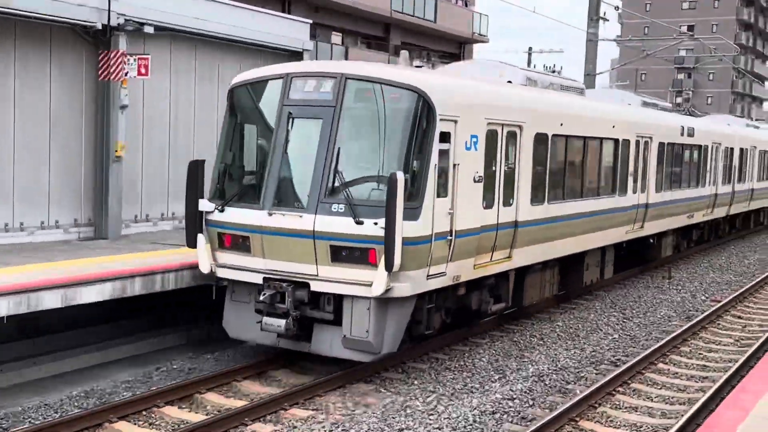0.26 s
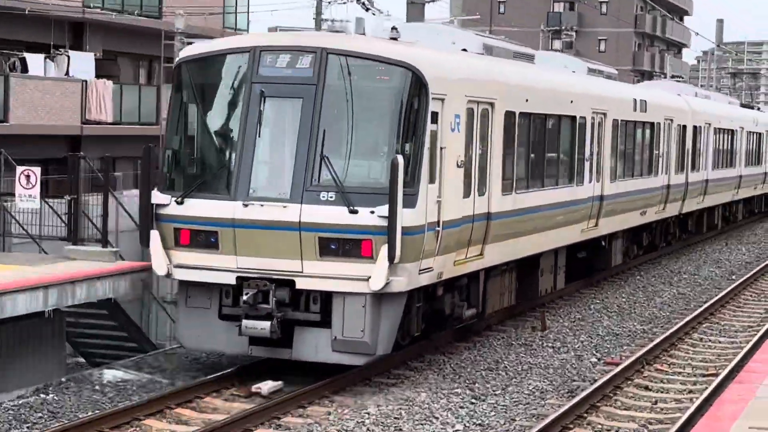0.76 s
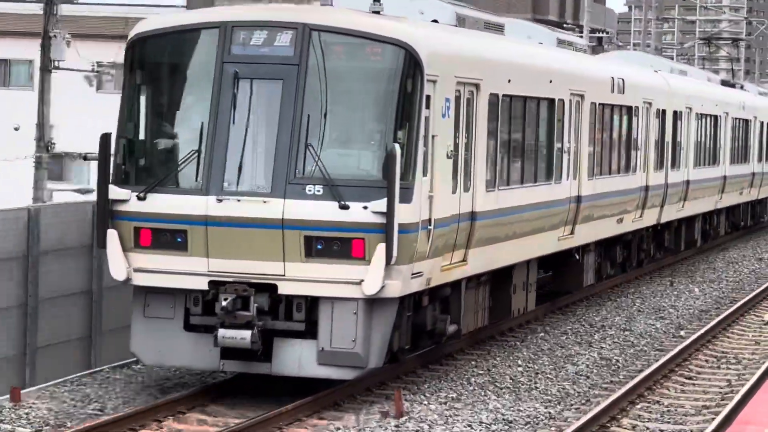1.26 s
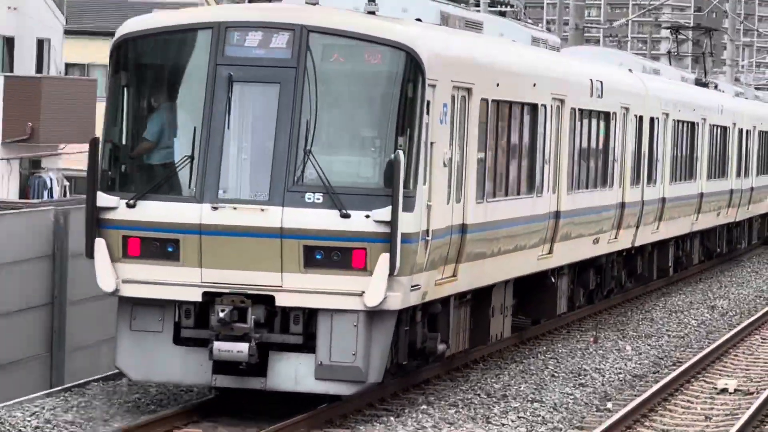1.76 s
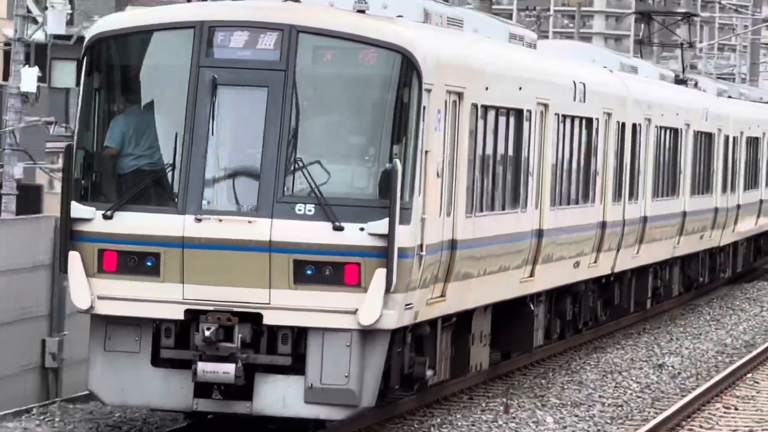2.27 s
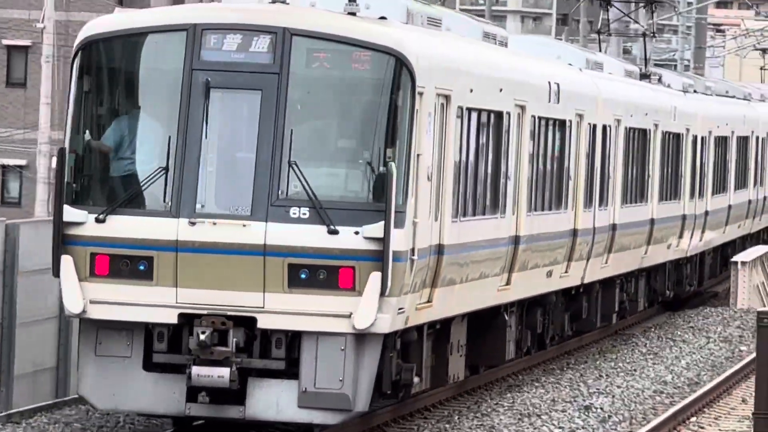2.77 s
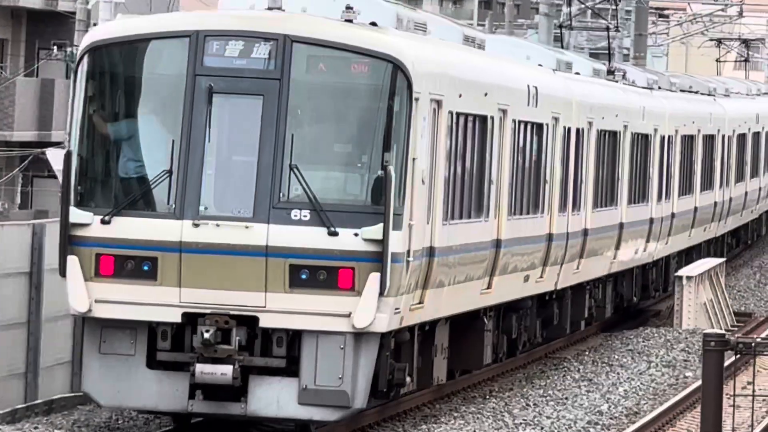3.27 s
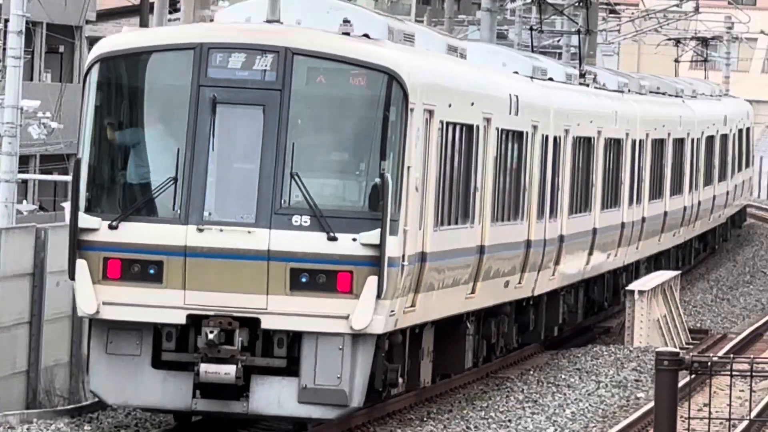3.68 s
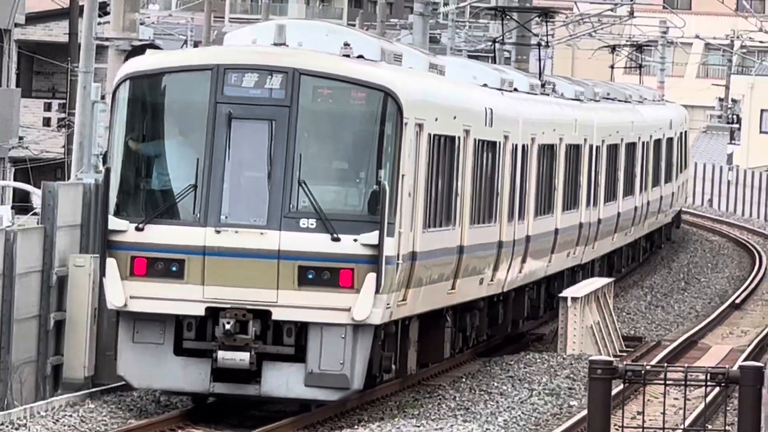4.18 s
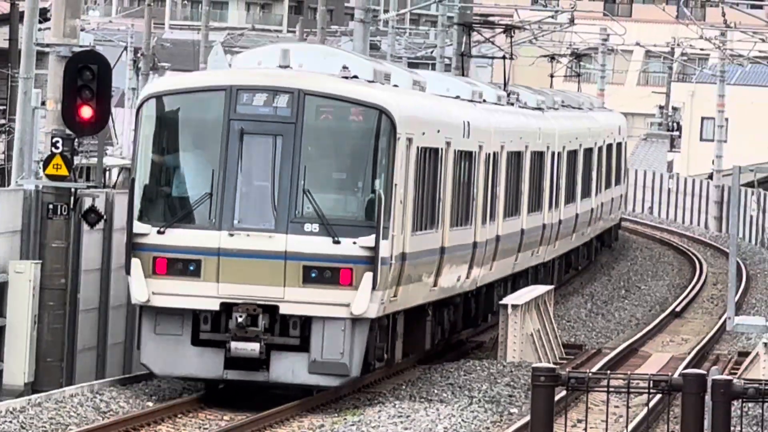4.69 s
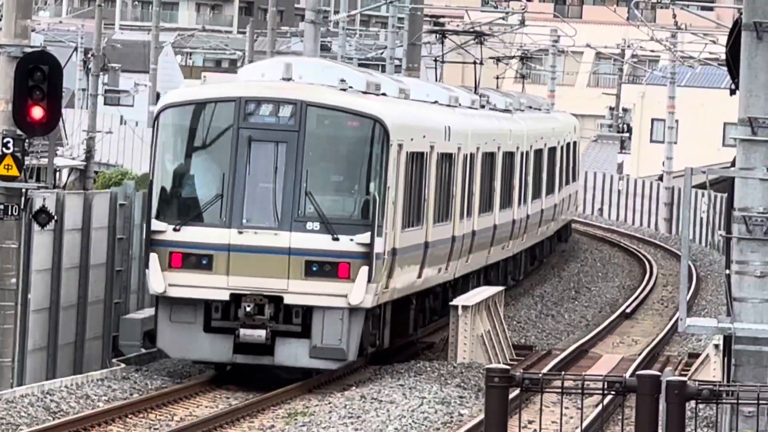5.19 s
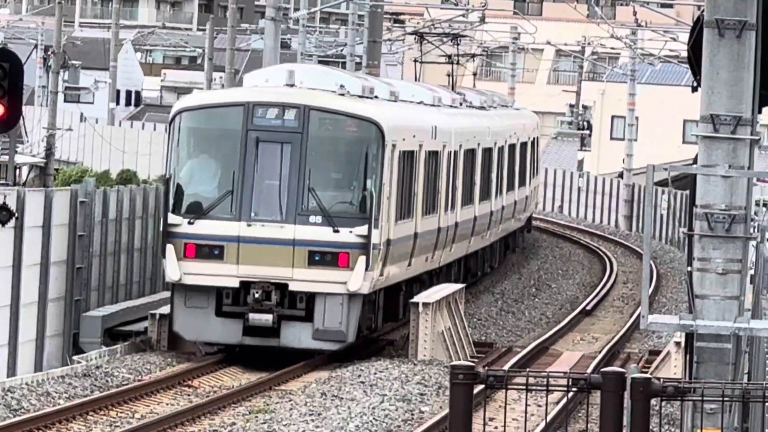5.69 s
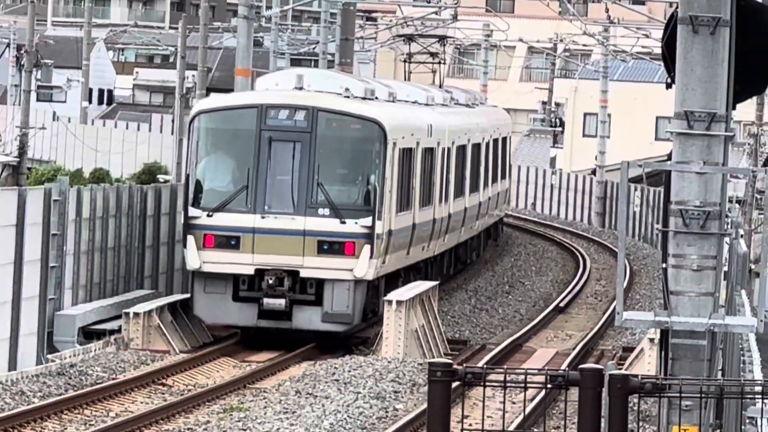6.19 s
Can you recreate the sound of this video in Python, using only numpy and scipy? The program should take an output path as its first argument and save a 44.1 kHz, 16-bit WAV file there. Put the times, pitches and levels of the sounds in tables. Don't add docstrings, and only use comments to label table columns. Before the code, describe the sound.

A hand-held camera on an open-air platform hears an electric train rolling away. From 0 s the last car is only a few metres off: a broad, rough roar of wheels on rail, with metallic ringing and soft joint clacks about every 0.2 seconds until 2.3 s. A fuzzy low gear hum around 390 Hz swells early, strongest near 0.6 s, and returns more weakly. Wind rumbles and flutters on the microphone, with deep thumps crowded between 0.1 and 0.7 s and a strong one at 2.45 s. The roar fades quickly at first, then gradually, growing duller. Slight scrapes come near 3.4 and 4.8 s. Wind builds again from 5 s, with thuds at 5.3 and 5.6 and the heaviest at 5.8 s. Faint bridge booms swell at 6.05 and 6.4 s under the distant rolling. Tiny dry ticks appear early, and faint chirps after 6.2 s, over very low hiss.

```python
import sys
import numpy as np
from scipy import signal
from scipy.io import wavfile
from scipy.ndimage import uniform_filter1d

SR = 44100
rng = np.random.default_rng(int(sys.argv[2]) if len(sys.argv) > 2 else 0)


def volts_from_decibels(level):
    exponent = np.asarray(level, float) / 20
    return 10 ** exponent


def unload_audio(sound):
    columns = np.transpose(np.atleast_2d(sound))
    steps = np.round(np.clip(columns, -1, 1) * 32767)
    wavfile.write(sys.argv[1], SR, steps.astype(np.int16))


N = 284445

# pitch_hz, level_db
HISS_SPECTRUM = [(200, -10), (9800, -8), (10300, -18), (11100, -18), (11400, 3), (13000, 3), (14000, 3),
                 (16000, 2.5)]
HISS_DB = -70.5

# time_s, peak_db, pitch_hz, width_hz, length_s
TICKS = [
    (0.02, -48, 12000, 4000, 0.0022),
    (.468, -54, 12000, 4000, .002),
    (1.153, -58, 13000, 2970, .002),
    (1.762, -50, 12500, 5000, 0.0014),
    (6.279, -65, 13000, 3000, .002),
    (6.288, -63, 9400, 710, .02),
    (6.445, -58.5, 9300, 600, 0.014),
]

# start_s, hold_s, level_db
GUSTS = [(0.0, 0.014, -29), (.13, 0.077, -32), (.25, 0.43, -35), (.84, 0.057, -39), (1.06, .06, -44),
         (1.33, .03, -39.5), (1.58, 0.16, -36.5), (2.1, 0.088, -36), (2.47, .04, -33.5), (2.64, .17, -36),
         (2.83, 0.043, -31.5), (3.05, 0.03, -40), (3.32, 0.072, -41), (3.5, .01, -39.5), (3.61, .02, -36.5),
         (3.82, 0.18, -38), (4.05, 0.43, -43), (4.77, 0.091, -36), (5.06, 0.11, -36.5), (5.27, 0.22, -33),
         (5.62, 0.041, -30), (5.83, 0.094, -29), (6.02, 0.081, -32), (6.33, 0.036, -41)]
LULL_DB, GUST_RISE_DB_PER_S, GUST_FALL_DB_PER_S = -48, 152, 140
WIND_LOW_HZ, WIND_TOP_HZ = 52, 68

# peak_s, peak_db, pitch_hz, pitch_fall (0-1)
EDDIES = [(.113, -17.5, 95, 0.12), (.148, -23, 110, 0.1), (.169, -23, 70, 0.1), (.185, -23, 70, 0.3),
          (.316, -21, 75, 0.16), (0.409, -21, 104, 0.08), (.432, -18.5, 99, 0.03), (0.456, -22, 65, 0.3),
          (0.527, -24, 70, .1), (.612, -18, 89, 0.43), (.632, -23, 65, .2), (.668, -24.5, 80, 0.1),
          (2.455, -16, 105, 0.6), (2.468, -25, 62, 0.17), (2.848, -24.5, 70, 0.13), (4.769, -27, 120, 0.56),
          (5.056, -26, 65, 0.4), (5.281, -17.5, 75, 0.24), (5.42, -31.5, 169, 0.24),
          (5.631, -19.5, 180, 0.3), (5.836, -13, 160, 0.33), (6.034, -29, 203, 0.27),
          (6.1, -22.5, 119, 0.9), (6.185, -28.5, 190, 0.1)]
EDDY_TURNS, EDDY_EXTRA_HZ = 1.58, 60

# start_s, hold_s, level_db
HUM_SPELLS = [(.1, 0.099, -35.5), (.59, 0.15, -33), (1.05, 0.33, -38.5), (1.7, 0.37, -39.5),
              (2.45, 0.45, -42.5), (3.85, .4, -45), (5.42, 0.19, -42.5), (6.3, .15, -43)]
HUM_REST_DB, HUM_RISE_DB_PER_S, HUM_FALL_DB_PER_S = -49, 129, 63
HUM_HZ, HUM_WIDTH_HZ = 392.6, 22

# pitch_hz, level_db (per Hz)
ROAR_SPECTRUM = [(25, -24), (45, 7), (65, -6.5), (130, 0.5), (260, 0), (500, -2.5), (800, -3), (1200, -12),
                 (1700, -16.5), (3200, -21.5), (5500, -31.5), (9600, -35), (10700, -50), (15500, -53.5)]
# pitch_hz, width_hz, over_roar_db, loss_db_per_s (as the train turns away)
WHEEL_RINGS = [(140, 57, 6.5, 1.3), (648, 44, 9, 14), (800, 56, 1.5, -0.4), (1065, 154, 4, 0),
               (1417, 100, 5.5, -0.5), (2007, 240, 7.5, .5), (2680, 260, 5.5, -0.5), (3637, 220, 2, -0.5),
               (4470, 530, 1.5, -0.1), (9300, 600, -3, -1)]
RING_DB = 1.5
# time_s, jolt_db
JOINTS = [(.023, 2), (.186, 3.5), (.397, 3.5), (.608, 3), (.832, 5), (1.05, 1.5), (1.264, 1), (1.47, 1),
          (1.69, 2), (1.884, 2), (2.114, 2.5), (2.3, 3.5)]
JOLT_S, JOLT_DULL = 0.027, 0.43
# time_s, jolt_db, extra_treble_db, length_s
SWELLS = [
    (3.422, 1, 4, 0.027),
    (3.527, -1, 4, 0.011),
    (4.847, -0.5, 2, .12),
    (6.05, 1.5, -1.5, 0.22),
    (6.38, 3.5, -2.5, 0.14),
]
START_M, SPEED_M_PER_S = 6.33, 11.4
ROAR_DB, SPREAD_DB = -33, -10
TREBLE_DB, AIR_DB_PER_M = -10.5, -.085
TREBLE_REF_DB = -15.5

# pitch_hz, likeness (0-1), left_lead_rad, left_minus_right_db
PORTS = [(60, .9, -.35, 0), (300, .9, -.2, 0), (600, .65, -.1, .5), (1050, .1, 0, 2), (1300, .5, 0, 2),
         (1800, .88, 0, 1), (2250, .98, .05, 0), (2450, .98, .1, 0), (2750, .925, .2, 0),
         (4300, .955, .2, 0), (5000, .99, .1, 0), (6700, .99, .15, 0), (7500, .97, 2, 0),
         (7700, .99, 2.9, 0), (8800, .99, 2.9, 0), (9050, .95, 1.9, 0), (10400, .95, .3, 0),
         (10700, 1, .05, 0), (12900, 1, -.1, 0), (13400, .97, -.25, 0), (13900, .7, -.9, 0),
         (14800, .5, -1.6, 0), (15600, .55, -2.0, 0)]
WIDE_S = 0.28
SQUELCH_DB, SQUELCH_HZ = -13, 1900
MASK_DB, MASK_FOLLOW = -37.5, 1.0


def evened(x):
    return x / np.sqrt(np.mean(x ** 2) + 1e-20)


def columns(table, at, warp=lambda v: v):
    key, *rest = np.transpose(table)
    return [np.interp(warp(at), warp(key), column) for column in rest]


def resonate(x, hz, width):
    turn = np.exp(2j * np.pi * np.cumsum(hz * np.ones(x.shape[-1])) / SR)
    r = np.exp(-np.pi * width / SR)
    return 2 * (turn * signal.lfilter([1 - r], [1, -r], x / turn)).real


def shaped_noise(field_db, size):
    hop = size // 4
    frames = N // hop + 5
    hz = np.fft.rfftfreq(size, 1 / SR)[:, None]
    s = np.arange(frames) * hop / SR
    a, b = rng.standard_normal((frames, len(hz), 2, 2)).T
    spectra = (a + 1j * b) * volts_from_decibels(field_db(hz, s))
    return signal.istft(spectra, nperseg=size, noverlap=3 * size // 4)[1][:, :N]


def spells(rows, rest_db, rise_db, fall_db):
    t = np.arange(N) / SR
    level_db = np.full(N, float(rest_db))
    for start, hold, db in rows:
        climb_db = rise_db * np.maximum(start - t, 0)
        decay_db = fall_db * np.maximum(t - start - hold, 0)
        level_db = np.maximum(level_db, db - climb_db - decay_db)
    return level_db


def amplifier_hiss():
    noise = shaped_noise(lambda hz, s: columns(HISS_SPECTRUM, hz)[0] + 0 * s, size=1024)
    return volts_from_decibels(HISS_DB) * evened(noise)


def ticks():
    t, out = np.arange(N) / SR, np.zeros(N)
    for s, db, hz, width, length in TICKS:
        near = slice(max(round((s - 3 * length) * SR), 0), round((s + 3 * length) * SR))
        puff = rng.standard_normal(4096)[:len(t[near])]
        puff = evened(resonate(resonate(puff, hz, width), hz, width))
        swell = np.exp(-((t[near][:len(puff)] - s) / length) ** 2)
        out[near][:len(puff)] += volts_from_decibels(db) * puff * swell
    return out


def wind():
    def field_db(hz, s):
        low_cut = (hz / WIND_LOW_HZ) ** 8 / (1 + (hz / WIND_LOW_HZ) ** 8)
        return 10 * np.log10(low_cut / (1 + (hz / WIND_TOP_HZ) ** 5.76) + 1e-12) + 0 * s
    rumble = shaped_noise(field_db, size=2048)
    power = uniform_filter1d(uniform_filter1d(rumble ** 2, size=900), size=900)
    swing = np.sqrt(abs(power) + 1e-20)
    lumps = evened(uniform_filter1d(uniform_filter1d(rng.standard_normal(N), size=900), size=900))
    gust_db = spells(GUSTS, LULL_DB, GUST_RISE_DB_PER_S, GUST_FALL_DB_PER_S)
    return evened(rumble / swing ** 0.47) * volts_from_decibels(gust_db + 2.0 * lumps + 3.0)


def eddies():
    t, out = np.arange(N) / SR, np.zeros(N)
    for s, db, hz, fall in EDDIES:
        half = EDDY_TURNS / (hz + EDDY_EXTRA_HZ)
        near = slice(max(round((s - 4 * half) * SR), 0), round((s + 8 * half) * SR))
        u = (t[near] - s) / half
        onset = np.exp(-(u / 0.52) ** 2)
        tail = np.exp(-(u / 1.22) ** 2 / (1 + 0.77 * abs(u)))
        shape = np.where(u > 0, tail, onset)
        turns = np.cumsum(hz * np.exp(-fall * np.tanh(u / 1.02))) / SR
        angle = 2 * np.pi * (turns - turns[np.argmin(abs(u))])
        out[near] += volts_from_decibels(db) * shape * (np.cos(angle) + 0.3 * shape * np.cos(2 * angle))
    return out


def gear_hum():
    wander = evened(uniform_filter1d(rng.standard_normal(N), size=6000))
    hz = HUM_HZ + 8 * wander
    tone = resonate(rng.standard_normal((2, N)), hz, HUM_WIDTH_HZ)
    tone = resonate(tone, hz, 4.8 * HUM_WIDTH_HZ)
    tone = tone / abs(uniform_filter1d(tone ** 2, size=2500)) ** 0.54
    return evened(tone) * volts_from_decibels(spells(HUM_SPELLS, HUM_REST_DB, HUM_RISE_DB_PER_S, HUM_FALL_DB_PER_S))


def wheel_ringing(hz, s):
    ring = 0
    for pitch, width, db, loss_db in WHEEL_RINGS:
        strength = volts_from_decibels(2 * np.maximum(db - loss_db * s, 0)) - 1
        ring = ring + strength / (1 + (2 * (hz - pitch) / width) ** 2) ** 2
    return ring


def jolts_db(hz, s, high):
    joints = [(time, db, -JOLT_DULL * db, JOLT_S) for time, db in JOINTS]
    lift_db = 0
    for time, db, treble_db, length in [*joints, *SWELLS]:
        lift_db = lift_db + (db + treble_db * high) * np.exp(-((s - time) / length) ** 2)
    return np.clip(np.log2((hz + 1) / 130), 0, 1) * lift_db


def roar():
    def field_db(hz, s):
        gone_m = SPEED_M_PER_S * s
        level_db = ROAR_DB + SPREAD_DB * np.log10(1 + gone_m / START_M)
        treble_db = TREBLE_DB + AIR_DB_PER_M * gone_m - TREBLE_REF_DB
        high = np.clip(np.log2((hz + 1) / 1000) / 2.53, 0, 1.3)
        ring_db = 10 * np.log10(1 + np.maximum(wheel_ringing(hz, s), -.9) * volts_from_decibels(2 * RING_DB))
        patches = rng.standard_normal((len(s), len(hz))).T
        patches = evened(uniform_filter1d(uniform_filter1d(patches, size=7, axis=0), size=9, axis=1))
        flicker = evened(uniform_filter1d(rng.standard_normal(len(s)), size=5))
        body_db = columns(ROAR_SPECTRUM, hz, np.log1p)[0] + ring_db + level_db + high * treble_db
        return body_db + jolts_db(hz, s, high) + 1.0 * patches + .3 * flicker
    return volts_from_decibels(-6.0) * shaped_noise(field_db, size=1024)


def scene():
    close_by = (eddies() + ticks()) * volts_from_decibels([[0], [-6]])
    return amplifier_hiss() + close_by + wind() + gear_hum() + roar()


def squelch(left, right, hz):
    pair = np.array([left + right, left - right]) / 2
    bands = (abs(pair[:, :1024]) ** 2).reshape(2, 64, 16, -1).mean(2)
    power = uniform_filter1d(bands, size=2, axis=2)[..., ::2]
    power = np.repeat(np.repeat(power, 2, axis=2), 16, axis=1)
    power = np.pad(power, ((0, 0), (0, 1), (0, 0)), "edge")[..., :pair.shape[2]]
    middle = uniform_filter1d(power[0, 32:192].mean(0), size=9)
    mask = volts_from_decibels(2 * MASK_DB) * middle.mean() * (middle / middle.mean()) ** MASK_FOLLOW
    heard = power > np.maximum(power[::-1] * volts_from_decibels(2 * SQUELCH_DB), mask)
    pair = pair * (heard | (hz < SQUELCH_HZ))
    pair = pair * ((abs(pair) ** 2 > 1.6 * mask) | (hz < 6000))
    return np.array([pair[0] + pair[1], pair[0] - pair[1]])


def roll_off(x):
    return signal.sosfilt(signal.butter(12, 15680, fs=SR, output="sos"), x)


def record(dry):
    hz, s, (shared, loose) = signal.stft(dry, SR, nperseg=2048, noverlap=1536)
    hz = hz[:, None]
    same, lead, balance_db = columns(PORTS, hz)
    bass_cut = hz ** 3 / (hz ** 3 + 41. ** 3)
    shared, loose = shared * bass_cut, loose * bass_cut
    width = np.exp(-(s / WIDE_S) ** 2)
    same = same * (1 - .25 * width * np.clip(1.6 - hz / 4800, 0, 1))
    right = (same * shared + np.sqrt(1 - same ** 2) * loose) * np.exp(-1j * lead)
    pair = squelch(shared * volts_from_decibels(balance_db / 2), right / volts_from_decibels(balance_db / 2), hz)
    pair = signal.istft(pair, SR, nperseg=2048, noverlap=1536)[1][:, :N]
    return roll_off(pair)


dry = scene()
out = record(dry)
unload_audio(out)
```